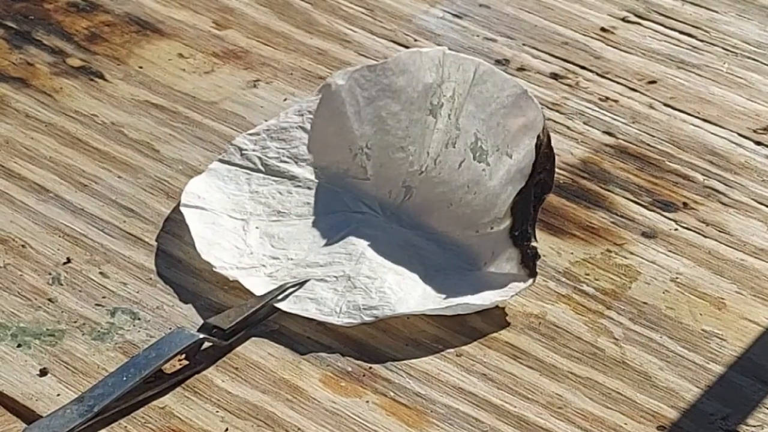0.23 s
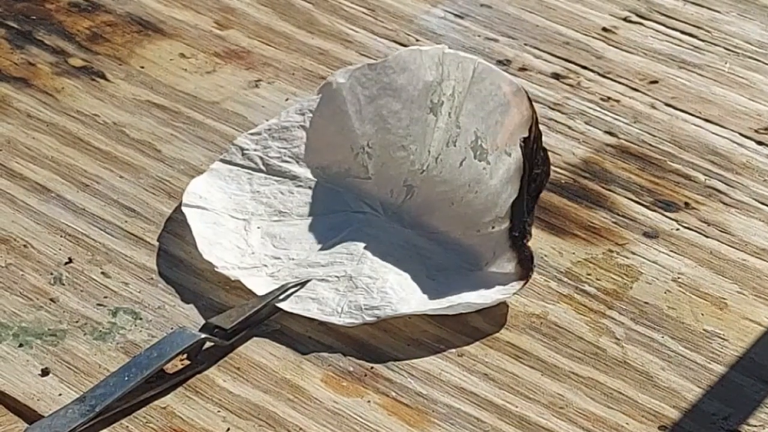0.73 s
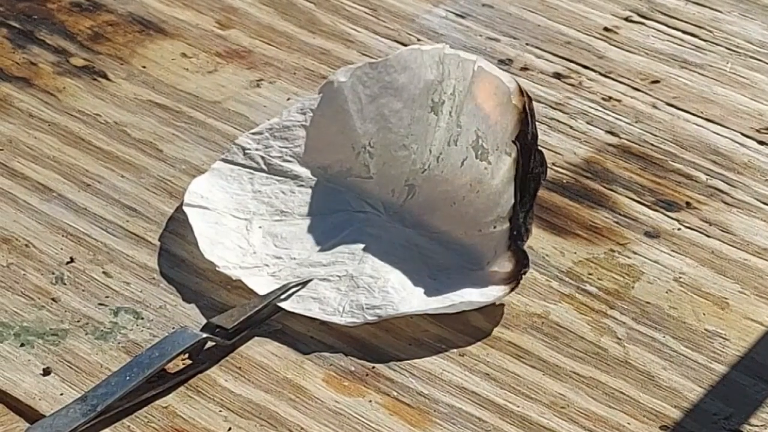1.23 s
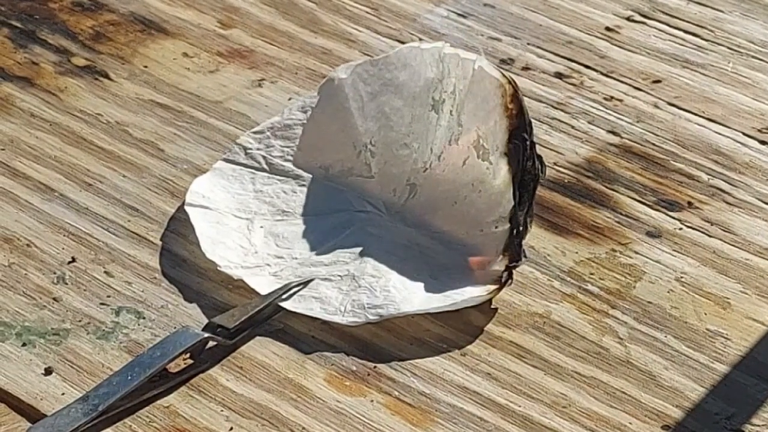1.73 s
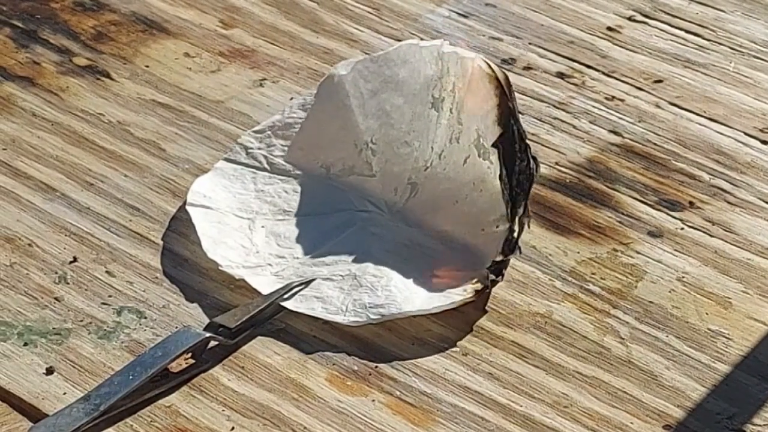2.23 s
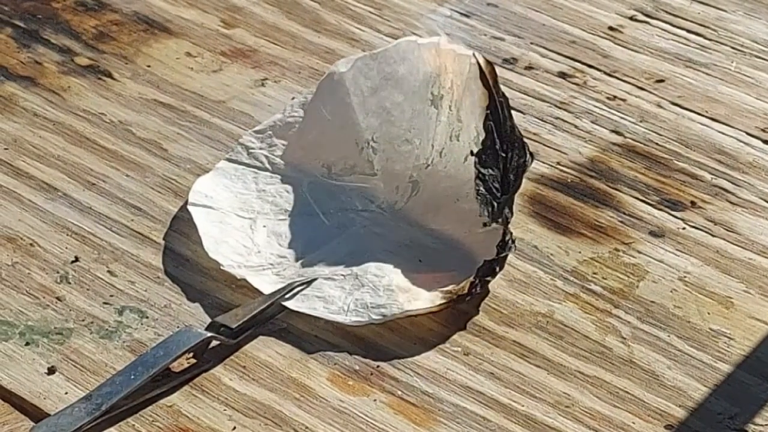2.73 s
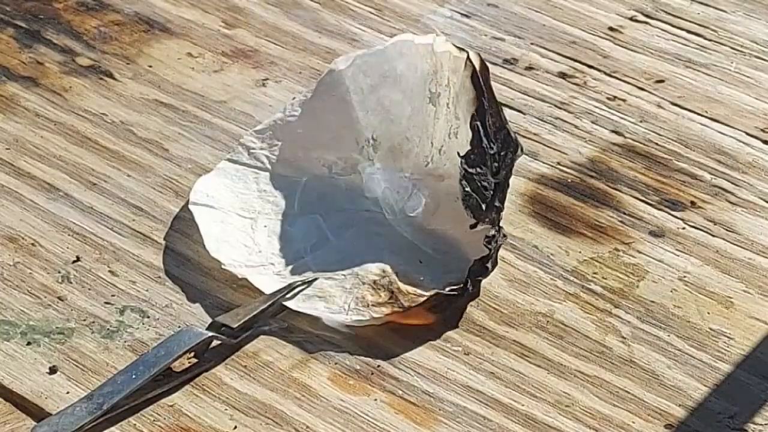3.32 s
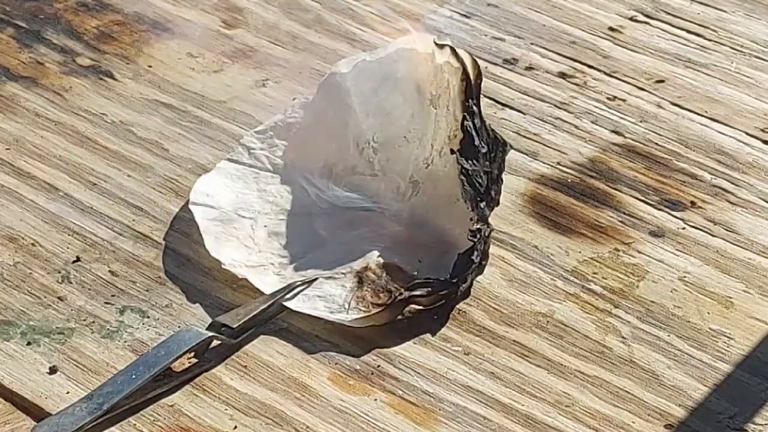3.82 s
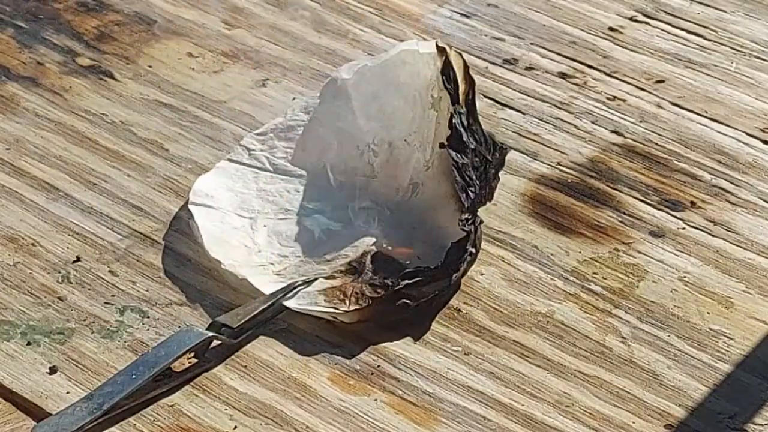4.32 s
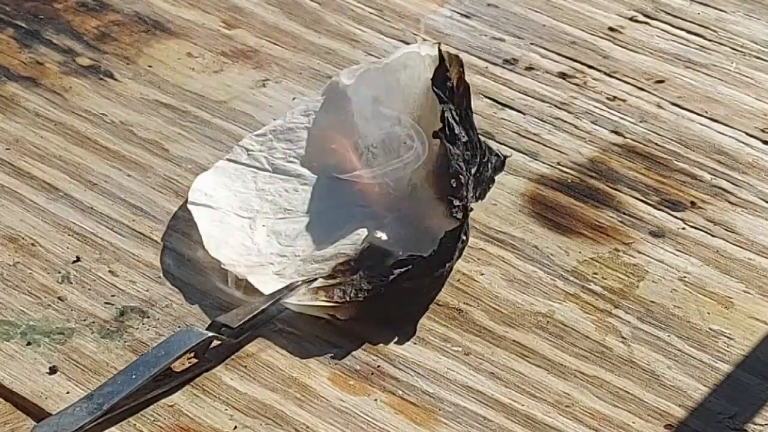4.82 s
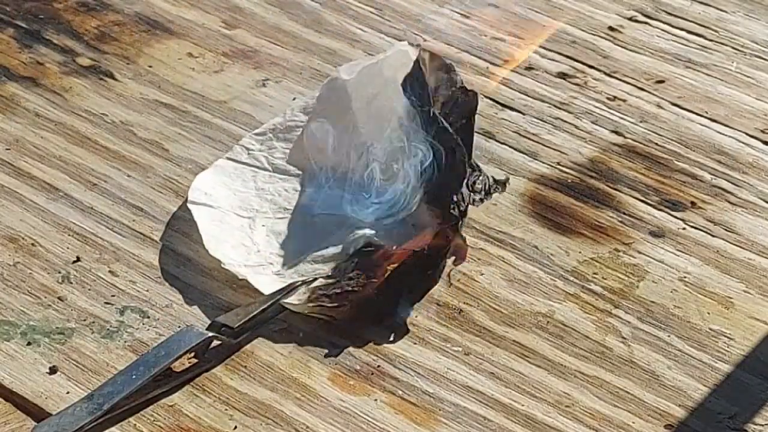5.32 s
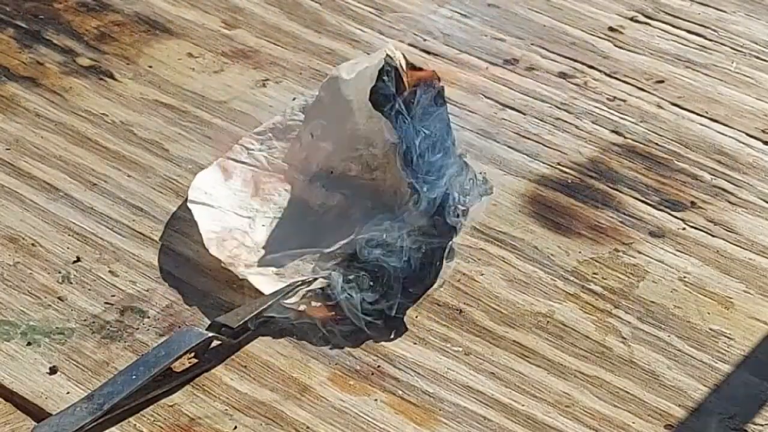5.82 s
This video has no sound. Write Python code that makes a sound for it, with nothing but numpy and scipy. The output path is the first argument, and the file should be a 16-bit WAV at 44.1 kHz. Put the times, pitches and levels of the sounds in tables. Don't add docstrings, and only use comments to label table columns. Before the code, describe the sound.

Outdoors, a paper sheet burns on a wooden board, heard very close in dry stereo. From 0 to 1.6 s it is hushed: low distant town rumble, barely audible hum and hiss, a few minute ticks, and thin high bird chirps far off at about 0.3, 0.6, 1.1 and 1.9 s. At 1.6 s bright, tiny snaps and light sizzle begin, with a sharp crack near 2.3 s and a cluster around 2.75 s. A brief thinning follows before crackling thickens from 3.2 s, peaking in a very loud double snap near 3.64 s. Around 4.0 to 4.3 s soft low thuds join tight bursts; another strong cluster comes at 4.7 to 4.8 s. From 5 s the sound turns duller, with rustling char, fluttering flame, woody thumps and many blunt pops, still dense at the 6 s end. Echoes are short and faint.

```python
import sys
import numpy as np
from scipy import signal
from scipy.fft import rfft, irfft
from scipy.io import wavfile
from scipy.ndimage import uniform_filter1d, minimum_filter1d

SR = 44100
rng = np.random.default_rng(int(sys.argv[2]) if len(sys.argv) > 2 else 0)


def store_pcm(level_fs):
    pcm = np.round(np.clip(level_fs, -1, 1) * 32767).astype(np.int16)
    wavfile.write(sys.argv[1], SR, np.atleast_2d(pcm).T)


def amplitude_ratio(level_db):
    exponent = np.asarray(level_db, float) / 20
    return 10 ** exponent


N = 267246
HZ = np.arange(N // 2 + 1) * SR / N

# frequency in Hz, level in dB per Hz.
PAPER = [(88, -37), (150, 3.5), (231, -10.5), (299, -8.5), (643, -8.5), (1140, -7), (2550, -9), (8290, -7),
         (9890, -15.5), (11800, -6), (15700, -8.5), (16600, -40)]
LEAD_US = 22.1


def on_log(table, hz):
    table_hz, value = np.transpose(table)
    return np.interp(np.log(hz + 1), np.log(table_hz + 1), value)


def band(x, lo_hz, hi_hz, order=2):
    edges_hz = [lo_hz, min(hi_hz, .45 * SR)]
    return signal.sosfilt(signal.butter(order, edges_hz, "band", fs=SR, output="sos"), x)


def split(hz, edge_hz):
    return 1 / (1 + (edge_hz / (hz + 1)) ** 4)


def unit(x):
    return x / np.sqrt(np.mean(x ** 2))


def walk(rate):
    k = int(SR / rate)
    held = np.repeat(rng.standard_normal(N // k + 1), k)
    return uniform_filter1d(uniform_filter1d(held, k), k)[:N]


def ring(table, size=256):
    hz = np.arange(size + 1) * SR / 2 / size
    cepstrum = irfft(np.log(amplitude_ratio(on_log(table, hz))))
    cepstrum[1:size] *= 2
    cepstrum[size + 1:] = 0
    return irfft(np.exp(rfft(cepstrum)))[:size]


def yard(t60_s, damp_hz):
    t = np.arange(int(t60_s * SR)) / SR
    tail = band(rng.standard_normal((2, len(t))), 150, damp_hz, order=1) * 1000. ** (-t / t60_s)
    return tail / np.sqrt(np.sum(tail ** 2, axis=1, keepdims=True))


def air():
    # frequency in Hz, level in dB per Hz.
    air_colour = [(15, -47), (30, -17.5), (41, -5.5), (58, 2.5), (92, -1), (187, -13.5), (252, -16),
                  (510, -24.5), (634, -26.5), (831, -31.5), (1250, -30), (4130, -36.5), (15200, -37.5),
                  (16500, -80)]
    # frequency in Hz, wander in Hz, level in dB.
    hum_lines = [
        (59, 3.6, -82.5),
        (124, 3.5, -78),
        (239, 1.2, -83),
    ]
    same = rfft(rng.standard_normal(N))
    own = rfft(rng.standard_normal((2, N)))
    alike = 1 / (1 + (HZ / 350) ** 2)
    both = np.sqrt(alike) * same + np.sqrt(1 - alike) * own
    town = amplitude_ratio(-70.5 + 2.5 * walk(4.03)) * unit(irfft(both * amplitude_ratio(on_log(air_colour, HZ)), N))
    hum = np.zeros(N)
    for hz, wander_hz, db in hum_lines:
        tone = np.sin(2 * np.pi * np.cumsum(hz + 2 * wander_hz * walk(9)) / SR)
        hum += amplitude_ratio(db) * amplitude_ratio(3.7 * walk(9)) * unit(tone)
    swell_db = 1.47 * (np.arange(N) / SR - 1.0) + 2.9 * walk(3)
    return town + hum * amplitude_ratio(swell_db)


def whistles():
    # start in seconds, length in seconds, first pitch in Hz, level in dB.
    falls = [
        (0, 0.02, 6960, -74),
        (.268, 0.04, 1650, -83),
        (.536, .03, 1640, -81),
        (4.82, .081, 7050, -81),
        (4.555, .015, 8500, -72),
        (5.785, 0.058, 7100, -64),
    ]
    chirps = [
        (.268, 0.081, 7250, -71),
        (.645, .035, 7200, -67),
        (1.129, 0.08, 7120, -70),
        (1.873, 0.083, 7300, -65),
        (2.52, 0.062, 7600, -68),
        (3.335, .06, 7560, -67),
    ]
    arches = [
        (.35, .42, 6590, -74.5),
    ]
    rises = [
        (1.305, .24, 6270, -83),
    ]
    climb_hz_per_s, ease = 22000, .92
    calls = []
    for s, length, hz, db in chirps:
        climb_hz = climb_hz_per_s * length
        calls.append((s, length, hz, hz + climb_hz / 2, hz + ease * climb_hz, db))
    for table, mid_hz, end_hz in ((arches, 500, 169), (rises, 377, 346), (falls, -35, -150)):
        for s, length, hz, db in table:
            calls.append((s, length, hz, hz + mid_hz, hz + end_hz, db))
    return calls


def birds():
    out, quaver = np.zeros(N), 1 + .012 * walk(120)
    for s, length, start_hz, mid_hz, end_hz, db in whistles():
        u = np.linspace(0, 1, int(length * SR))
        hz = np.polyval(np.polyfit([0, .5, 1], [start_hz, mid_hz, end_hz], 2), u)
        at = int(s * SR)
        span = slice(at, at + len(u))
        tone = np.sin(2 * np.pi * np.cumsum(hz * quaver[span]) / SR)
        out[span] += amplitude_ratio(db) * np.sin(np.pi * u) ** 0.32 * tone
    out = out * amplitude_ratio(4 * walk(30))
    echoes = signal.fftconvolve(band(out, 4000, 10000)[None], yard(0.52, 12000))[:, :N]
    side = amplitude_ratio(np.array([[-2.5], [.1]]))
    return side * (out + amplitude_ratio(-2.5) * echoes)


def heat(t):
    # time in seconds, heat in dB, dull char against sizzle in dB.
    burn = [(1.62, -77, -13), (1.71, -72, -17), (1.87, -66.5, -4.5), (1.99, -69, -7), (2.14, -68, -15),
            (2.34, -74, -10), (2.76, -73, -17), (3.42, -65.5, -6), (3.59, -58, -11), (3.71, -63, -4),
            (4.29, -68, -4), (4.53, -62.5, -0.5), (4.65, -68, -2), (4.85, -59, 1), (5.18, -65.5, -3.5),
            (5.43, -61, 1), (5.58, -58, 6), (6.06, -63, 7.5)]
    s, heat_db, char_db = np.transpose(burn)
    return np.interp(t, s, heat_db, left=-150), np.interp(t, s, char_db)


def breaks(count=90):
    # time in seconds, crack level in dB.
    scorch = [(.022, -81), (.365, -80), (.7113, -87), (.8149, -83), (.8357, -89), (.8598, -86),
              (.8868, -82), (.8928, -77), (.914, -82), (.944, -82), (.9752, -80.5), (1.3226, -90.5),
              (1.352, -82.5), (1.4885, -80), (1.5677, -86), (1.586, -80.5)]
    # time in seconds, crack level in dB.
    ticks = [(1.62, -71), (1.6678, -69), (1.7862, -73), (1.9793, -65), (1.9924, -67), (2.2315, -65),
             (2.2371, -63), (2.2675, -84), (2.52, -63), (2.5522, -72), (2.6958, -51.5), (2.7482, -48.1),
             (2.9194, -58.7), (2.9231, -58), (2.9259, -60), (2.9718, -72.4), (2.9775, -69), (3.0076, -59.5),
             (3.0337, -62), (3.1059, -66.8), (3.1218, -63.3), (3.1807, -57), (3.2019, -60), (3.2163, -60),
             (3.2308, -52), (3.2341, -49), (3.4358, -60), (3.4391, -56), (3.5461, -52), (3.5665, -71),
             (3.579, -51), (3.601, -62.2), (3.6828, -64), (3.8069, -52), (3.8976, -54), (4.0017, -53.5),
             (4.1254, -60), (4.422, -86), (4.4398, -54), (4.4422, -62), (4.5578, -72), (4.5745, -52.5),
             (4.6823, -71), (4.7145, -60), (4.7298, -56), (4.8449, -75), (4.867, -57.1), (5.3562, -73),
             (5.4005, -58), (5.4185, -65)]
    pricks = [(1.6598, -69), (1.6755, -68), (1.6793, -53), (1.6993, -67), (1.7036, -57), (1.7168, -61),
              (1.7378, -62.5), (1.7811, -67), (1.7923, -55), (1.7956, -57.5), (1.9033, -58.5),
              (1.9549, -62.5), (2.0519, -57.5), (2.1456, -70), (2.2109, -58.5), (2.2401, -52.5),
              (2.272, -52.5), (2.2819, -48), (2.3256, -52), (2.4085, -65.5), (2.9013, -71), (3.0469, -52),
              (3.2703, -67), (3.3271, -64), (3.4024, -61), (3.4095, -53), (3.424, -58), (3.4479, -59),
              (3.669, -59), (3.6906, -54.5), (3.7079, -57), (3.7232, -53.5), (3.759, -61.5), (3.9135, -82),
              (3.9585, -58), (3.9732, -76), (4.4963, -61.9), (4.5237, -57), (4.6317, -57), (4.7105, -58.5),
              (4.8168, -55), (4.8765, -55), (4.9327, -51.5), (4.9525, -57), (5.0313, -53.5), (5.0632, -60),
              (5.089, -60), (5.1135, -64), (5.1386, -68), (6.0432, -46)]
    snappy = [(1.7096, -60), (1.8503, -59.5), (1.9064, -69.5), (1.9117, -55), (1.9651, -80), (1.9964, -67),
              (2.0218, -62.5), (2.0656, -59.5), (2.1545, -60), (2.2992, -60), (2.7121, -74), (3.0361, -73),
              (3.3185, -68.2), (3.518, -64), (3.8129, -56.5), (4.2611, -63), (4.4882, -57.5), (4.5968, -65),
              (4.6028, -66), (4.6144, -71), (4.7948, -61), (4.9688, -50.1), (5.054, -60), (5.072, -77),
              (5.2067, -77), (5.2639, -60), (5.268, -52), (5.2737, -70), (5.3271, -65), (5.3598, -64),
              (5.3921, -53.5), (5.4325, -61.5), (5.439, -62), (5.468, -56), (5.5673, -60), (5.5702, -75),
              (5.5783, -58), (5.5838, -60), (5.5987, -61.5), (5.6076, -53.5), (5.6292, -55), (5.634, -62),
              (5.6404, -57.5), (5.719, -70), (5.8652, -66), (5.9047, -63.4), (5.9531, -52.5),
              (5.9738, -56.5), (5.9875, -59), (5.9951, -64)]
    cracks = [(2.4014, -60.5), (2.4335, -57.5), (2.4736, -68), (2.7281, -54), (2.7313, -49.5),
              (2.7418, -60), (3.0767, -50), (3.1411, -69), (3.1507, -53), (3.1594, -53.5), (3.1859, -56),
              (3.2383, -49), (3.2434, -60), (3.2457, -47), (3.252, -57), (3.2675, -60), (3.274, -49),
              (3.3856, -50), (3.4422, -53), (3.5255, -47.5), (3.5884, -72), (3.711, -55), (3.8751, -52.5),
              (3.9331, -57), (3.9538, -43.5), (4.0134, -45), (4.0254, -52), (4.1065, -61), (4.2149, -62.5),
              (4.2388, -56), (4.2425, -72), (4.2452, -56), (4.25, -49.5), (4.2637, -48.5), (4.27, -45),
              (4.2825, -48), (4.5278, -56.5), (4.6447, -51.5), (4.7195, -46), (4.8012, -69), (4.8617, -58),
              (4.8911, -56), (4.9119, -48.5), (4.9145, -56), (4.9183, -53), (4.9219, -52), (5.0978, -55),
              (5.1552, -67), (5.217, -61.5), (5.7218, -56)]
    creases = [(2.2762, -52.8), (2.2889, -53), (2.3028, -45.5), (2.3687, -73), (2.7449, -44.5),
               (3.241, -50), (3.2891, -54), (3.3956, -57), (3.3978, -50.5), (3.4815, -51.5), (3.4998, -70),
               (3.5206, -53), (3.5971, -54), (3.6033, -57.5), (3.6071, -48.5), (3.6108, -47.5),
               (3.6635, -61), (3.7266, -50), (3.7721, -72), (3.7916, -69), (3.842, -59.5), (3.8521, -70.1),
               (3.9616, -54.5), (3.987, -57.9), (4.0422, -47.5), (4.0466, -43.5), (4.1448, -67),
               (4.2101, -60), (4.4617, -45.5), (4.4852, -46), (4.5893, -56.5), (4.6231, -61),
               (4.6411, -52.5), (4.7749, -44.5), (4.829, -54), (4.9093, -57), (4.9255, -54),
               (4.9661, -49.5), (4.9815, -46), (5.0471, -58), (5.1747, -52.1), (5.3402, -74), (5.4599, -67),
               (5.5027, -67), (5.6213, -53.5), (5.731, -50), (5.7668, -54.5), (5.8973, -54.5),
               (6.0105, -55), (6.0354, -47.5)]
    pops = [(2.753, -53), (3.3132, -71.5), (3.3414, -69), (3.4844, -66), (3.4946, -60), (3.7646, -64),
            (3.8253, -72), (4.0536, -58.1), (4.0624, -61), (4.3417, -68.3), (4.6667, -55), (4.7531, -80),
            (4.7634, -53.9), (4.7676, -45), (4.7781, -46), (5.2256, -58.5), (5.248, -60), (5.2563, -65),
            (5.3017, -65.5), (5.4107, -54), (5.4476, -55), (5.4777, -55), (5.4912, -51), (5.5224, -50.5),
            (5.526, -49.5), (5.5386, -68), (5.6262, -65), (5.6553, -59), (5.658, -64), (5.6753, -69),
            (5.679, -55), (5.6954, -60), (5.7016, -64), (5.7122, -53), (5.756, -64), (5.7624, -66.3),
            (5.7798, -47), (5.7895, -48), (5.8063, -55), (5.8291, -77), (5.8503, -51), (5.8852, -54.5),
            (5.9205, -62), (5.9286, -85), (5.9384, -56.5), (5.9505, -48), (5.9641, -70), (6.0173, -61),
            (6.0222, -53), (6.0302, -48)]
    # time in seconds, 2-8 kHz crack in dB, buckle below 2 kHz in dB against the crack, tick
    # above 8 kHz in dB against the crack, length in ms.
    bursts = [(2.1602, -53.5, 7.5, 15.5, 0.23), (2.2446, -37, -11.5, -1.5, 0.43),
              (2.3091, -51, 2.5, 9, 0.57), (2.3408, -28.5, -1.5, 2.5, 0.54), (2.3453, -53.5, 1, -3, 0.76),
              (2.7589, -40.5, -5, -14, 0.66), (3.2814, -36, 0, -3, 0.79), (3.3232, -44.5, -2, 1, 0.47),
              (3.4273, -43.5, -2, 2.5, 0.3), (3.4506, -44.5, -4.5, 1, 0.47), (3.4543, -33, -1, -5, 0.5),
              (3.458, -43.5, -5.9, -8, 0.86), (3.4631, -37.5, -1.5, 4, 0.71),
              (3.6325, -45.5, 4.5, 9.5, 0.87), (3.6416, -27.5, -2.5, 0, 0.75),
              (3.6451, -22.5, -0.3, -2, 0.48), (4.0298, -42.5, -2.5, -2, 0.77),
              (4.0495, -46, 0.5, -11, 0.18), (4.1795, -44, -7.5, 6, 0.53), (4.2964, -45, -12, 9, 0.82),
              (4.2998, -45, -12, -8, 0.33), (4.3056, -39, -6.5, -8, 0.47), (4.3103, -38, -1.3, 2.5, 0.63),
              (4.6922, -47, 0, 1, 0.71), (4.7229, -37, -10, -1, 0.6), (4.7333, -30, -7, 6.5, 0.49),
              (4.7576, -46, 2.5, 4, 0.43), (4.7702, -50.5, 2, -9.5, 0.64), (4.7833, -43, 5, 0.5, 0.54),
              (4.7873, -48, 0, 3, 0.85), (4.9436, -41, -0.2, -5, 0.85), (5.2606, -52, 14.5, 5, 1),
              (5.3877, -41.5, 10.5, -7, 0.87), (5.499, -51, 12.5, -18, 0.78),
              (5.5314, -37.5, -1.8, -20, 0.62), (5.5921, -50.5, 5.5, 3, 0.33),
              (5.6692, -58.5, 18.5, -14, 0.63), (6.0034, -44.5, -9, -5, 0.4),
              (6.0532, -35.5, 11.5, -7, 0.21), (6.058, -58, 7, 0.5, 0.74)]
    kinds = ((ticks, (-11.5, 6.9)), (snappy, (4.4, 0.79)), (cracks, (-12, -3.5)), (pops, (3.36, -19)),
             (pricks, (-2.1, 6.3)), (creases, (-4.2, -6.5)), (scorch, (-2.1, 9)))
    rows = np.vstack([np.hstack([table, np.tile(colour, (len(table), 1))]) for table, colour in kinds])
    scatter_db = 1.62
    rows = rows + scatter_db * rng.standard_normal(rows.shape) * np.array([0, 0, 1, 1])
    luck = rng.random((count, 2))
    tint_db = 2 * scatter_db * rng.standard_normal((count, 2))
    s = 1.65 + 4.39 * luck[:, 0] ** .6
    heat_db, char_db = heat(s)
    crack_db = heat_db - 6 + 3.5 * luck[:, 1]
    buckle_db = 2.5 + char_db + tint_db[:, 0]
    tick_db = -11 - char_db + tint_db[:, 1]
    rows = np.vstack([rows, np.array([s, crack_db, buckle_db, tick_db]).T])
    ms = np.full((len(rows), 1), .6)
    return np.vstack([bursts, np.hstack([rows, ms])]).T


def snaps(size=512, count=128):
    s, db, low_db, high_db, ms = breaks()
    t = (np.arange(size) - count) / SR
    chance = rng.standard_normal((len(s), 2 * size + 3))
    stretch = (np.maximum(ms, .1)[:, None] / 0.54) ** 3.55
    after = np.exp(-t / (0.00041 * stretch)) + amplitude_ratio(-12.5) * np.exp(-t / (0.0026 * stretch))
    before = np.exp(t / (0.00032 * stretch)) + amplitude_ratio(-15) * np.exp(t / 0.0012)
    spikes = chance[:, 3:size + 3] * amplitude_ratio(4.2 * chance[:, size + 3:])
    hz = np.arange(size // 2 + 1) * SR / size
    tear = rfft(spikes * np.where(t < 0, before, after))
    evened = uniform_filter1d(np.abs(tear) ** 2, size=9) ** (0.32 / 2)
    tear = tear / evened * rfft(ring(PAPER), size)
    turn = 2 * np.pi * 1260 * amplitude_ratio(0.9 * chance[:, 1:2]) * t
    push = rfft(np.cos(turn + 0.59) * np.exp(-np.where(t < 0, -1.1, .4) * turn))
    tear_size = np.abs(tear[:, 3:24]).mean(axis=1, keepdims=True)
    push_size = np.abs(push[:, 3:24]).mean(axis=1, keepdims=True)
    push = amplitude_ratio(0.5) * push * tear_size / push_size
    low, high = 1 - split(hz, 2200), split(hz, 8000)
    parts = (((tear + push) * low * split(hz, 262), db + low_db + 0.023),
             (tear * (1 - low - high), db + 0.035),
             (tear * high, db + high_db + 0.1))
    shape = 0
    for part, level_db in parts:
        energy = np.sqrt(np.sum(irfft(part) ** 2, axis=1) / 110)
        shape = shape + part * (amplitude_ratio(level_db) / energy)[:, None]
    lead = np.exp(1j * np.pi * hz * 1e-6 * (LEAD_US + 17.3 * chance[:, 2:3]))
    out = np.zeros((2, N + 2 * size))
    for port, lag in zip(out, (lead, 1 / lead)):
        np.add.at(port, (s * SR).astype(int)[:, None] + np.arange(size), irfft(shape * lag))
    return out[:, count:N + count]


def stirring(breaking):
    k = int(0.0077 * SR)
    power = uniform_filter1d(uniform_filter1d(np.mean(breaking ** 2, axis=0), k), k)
    return 0.52 * 10 * np.log10(1 + np.maximum(power, 0) / amplitude_ratio(-67.5) ** 2)


def grains(per_s, spread_db, patchy_db):
    hit = rng.random(N) < per_s / SR * amplitude_ratio(patchy_db * walk(40))
    level_db = np.minimum(spread_db * rng.exponential(size=N), 18)
    cracks = hit * rng.standard_normal(N) * amplitude_ratio(level_db)
    return signal.fftconvolve(cracks, ring(PAPER))[:N]


def burning(stir_db):
    heat_db, char_db = heat(np.arange(N) / SR)
    heat_db = heat_db + stir_db - 6
    sizzle_db, rustle_db = heat_db - 4.5, heat_db + char_db - 7.5
    flame_db = -70.5 + 0.72 * (rustle_db + 82.0)
    cracks = grains(per_s=2100, spread_db=5.0, patchy_db=-5.5)
    frying = unit(signal.fftconvolve(rng.standard_normal(N), ring(PAPER))[:N])
    cracks = unit(cracks) + frying * amplitude_ratio(4.5 * walk(45))
    crumpling = unit(grains(per_s=1900, spread_db=10.0, patchy_db=1.0))
    rustle = unit(band(cracks + 2.9 * crumpling, 430, 4100))
    flame = unit(band(rng.standard_normal(N), 54, 350) * amplitude_ratio(5.2 * walk(8.6)))
    char = amplitude_ratio(sizzle_db + 2.5) * unit(band(cracks, 2300, 25000)) + amplitude_ratio(rustle_db - 2.0) * rustle
    lead = np.exp(1j * np.pi * HZ * 1e-6 * LEAD_US)
    fizz = amplitude_ratio(4.5 * split(HZ, 10500))
    return irfft(rfft(char) * fizz * np.array([lead, 1 / lead]), N) + amplitude_ratio(flame_db - 8.0) * flame


def puffs(size=2048):
    # start in seconds, peak level in dB.
    thumps = [(2.336, -50), (3.28, -57.5), (3.453, -49), (3.636, -54), (3.95, -53), (4.023, -42.5),
              (4.173, -42), (4.304, -40), (4.825, -50), (4.939, -43), (5.169, -50), (5.257, -45.5),
              (5.38, -40.5), (5.879, -44.5)]
    s, db = np.transpose(thumps)
    t = np.arange(size) / SR
    hz = 257 * amplitude_ratio(1.53 * rng.standard_normal((len(s), 1)))
    rumble = unit(band(rng.standard_normal((len(s), size)), 130, 550, order=1))
    swell = (1 - np.exp(-t / 0.0011)) * 1000. ** (-t / 0.041)
    thud = (np.sin(2 * np.pi * hz * t) + 0.37 * rumble) * swell
    out = np.zeros(N + size)
    np.add.at(out, (s * SR).astype(int)[:, None] + np.arange(size), amplitude_ratio(db)[:, None] * thud)
    return out[:N]


def scene():
    breaking = snaps()
    fire = breaking + burning(stirring(breaking)) + puffs()
    delay = int(0.0083 * SR)
    fence = amplitude_ratio(-21) * np.pad(band(fire, 130, 19000, order=1), ((0, 0), (delay, 0)))[:, :N]
    scatter = amplitude_ratio(-19) * signal.fftconvolve(fire, yard(0.025, 6000), axes=1)[:, :N]
    far = amplitude_ratio(-37.0) * signal.fftconvolve(fire, yard(0.65, 5200), axes=1)[:, :N]
    return fire + fence + scatter + far + birds() + air()


def above(edge_hz):
    return .5 + .5 * np.tanh((HZ - edge_hz) / 400)


def thin_hush(x):
    out, reach = x, int(0.011 * SR)
    for lo_hz, hi_hz in ((3000, 5500), (5500, 8500), (8500, 11500), (11500, 17000)):
        part = irfft(rfft(x) * (above(lo_hz) - above(hi_hz)), N)
        db = 10 * np.log10(uniform_filter1d(np.mean(part ** 2, axis=0), size=128) + 1e-16)
        ahead_db = -minimum_filter1d(-db, 2 * reach, origin=-(reach // 3))
        lost = np.clip(((ahead_db - db) * amplitude_ratio(4 * walk(40)) - 18) / 4, 0, 1)
        out = out - part * (1 - amplitude_ratio(-17 * uniform_filter1d(lost, size=64)))
    return out


def band_limit(x):
    return signal.sosfilt(signal.butter(12, 17000, fs=SR, output="sos"), x)


def record(dry):
    # frequency in Hz, left minus right in dB.
    port_db = [(40, -6), (150, -11.5), (300, -4.5), (3000, -4.5), (15000, 1)]
    tilt = amplitude_ratio(on_log(port_db, HZ) / 2)
    ports = irfft(rfft(dry) * np.array([tilt, 1 / tilt]), N)
    mix = thin_hush(ports)
    return band_limit(mix)


dry = scene()
out = record(dry)
store_pcm(out)
```